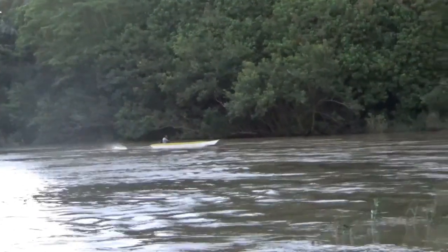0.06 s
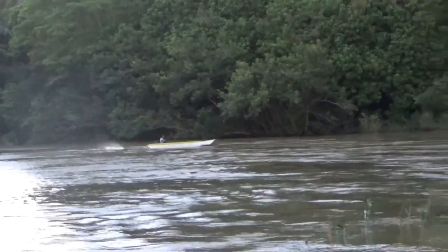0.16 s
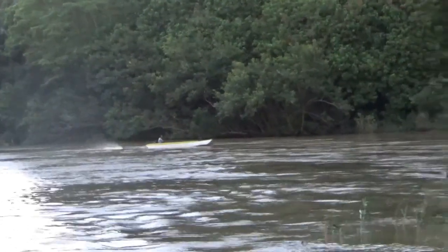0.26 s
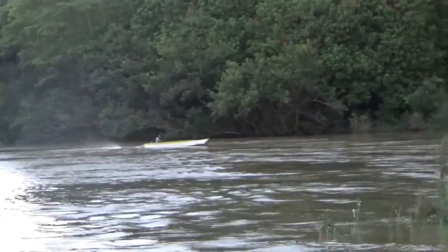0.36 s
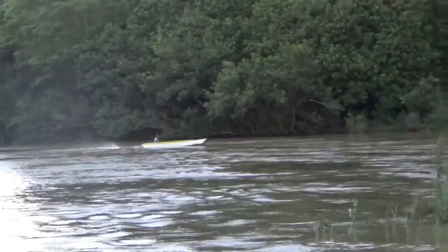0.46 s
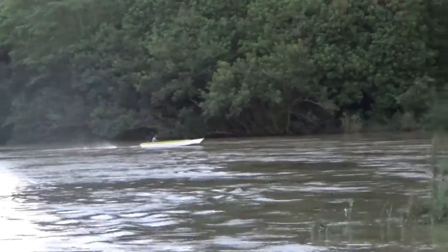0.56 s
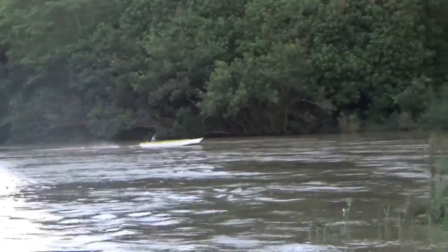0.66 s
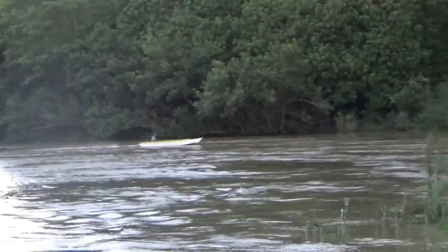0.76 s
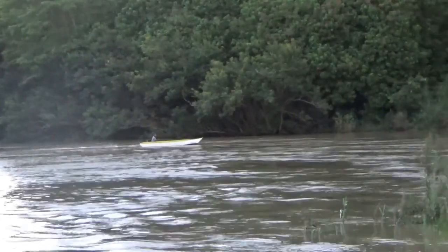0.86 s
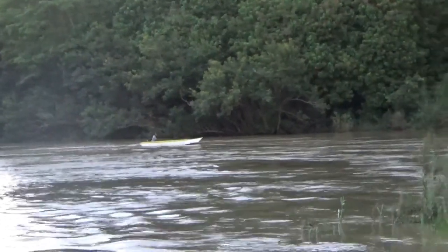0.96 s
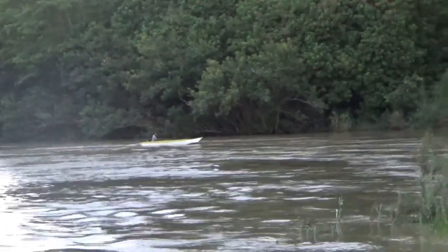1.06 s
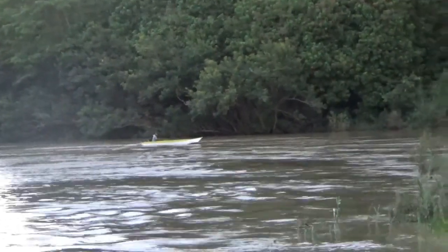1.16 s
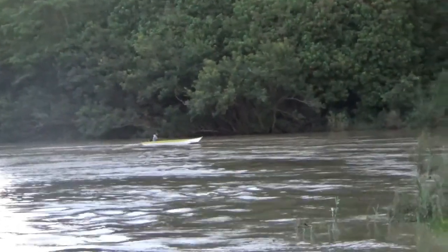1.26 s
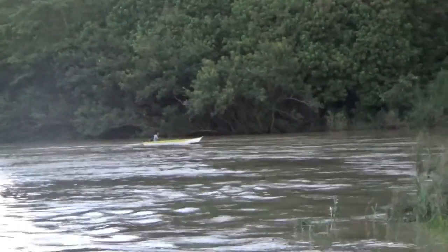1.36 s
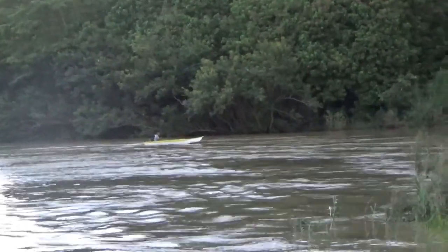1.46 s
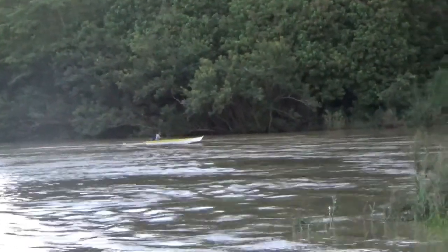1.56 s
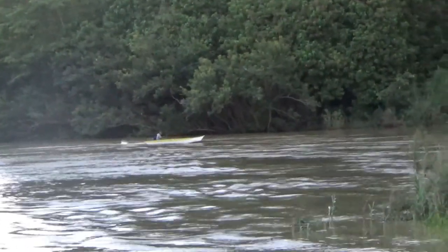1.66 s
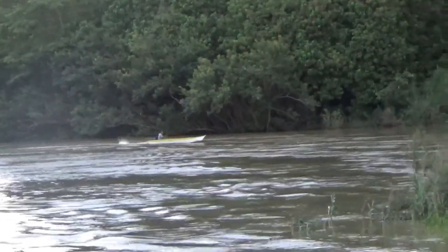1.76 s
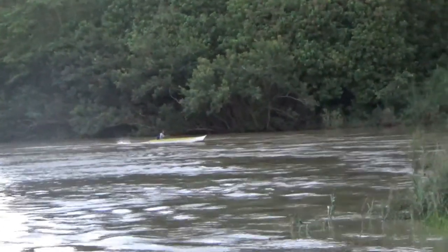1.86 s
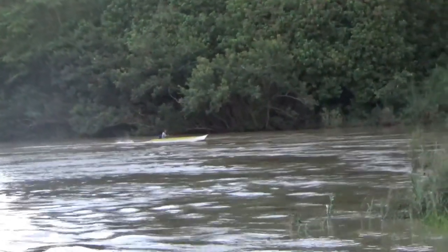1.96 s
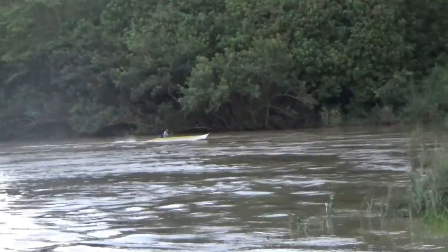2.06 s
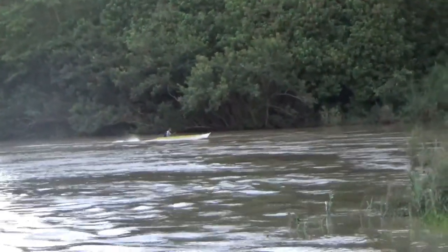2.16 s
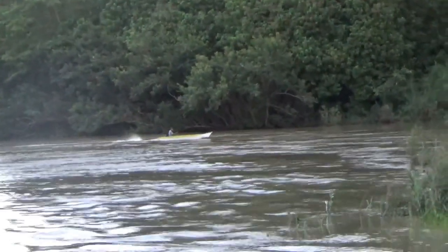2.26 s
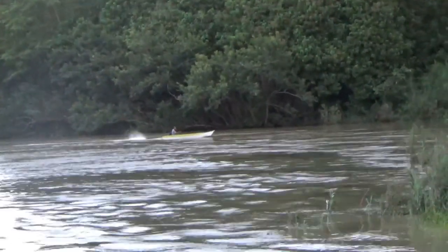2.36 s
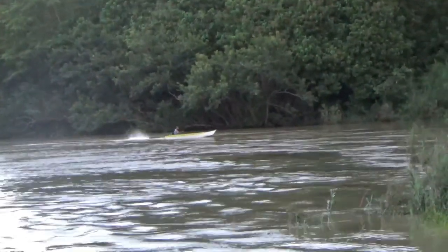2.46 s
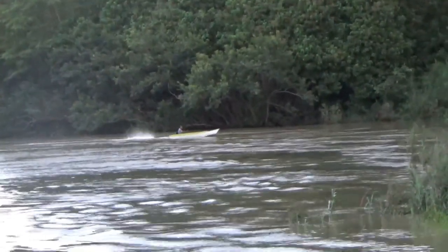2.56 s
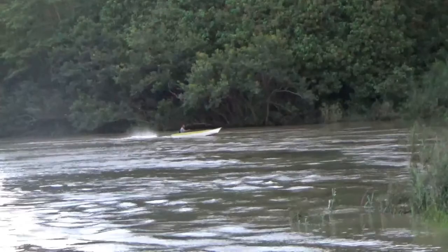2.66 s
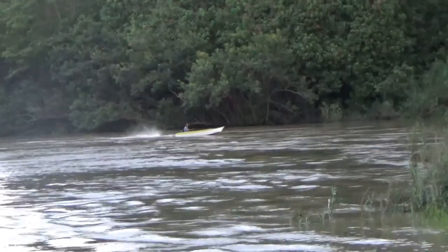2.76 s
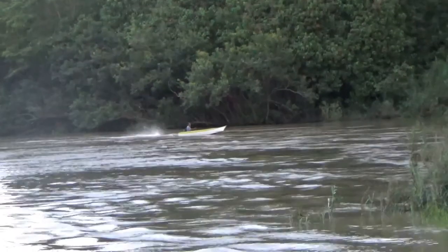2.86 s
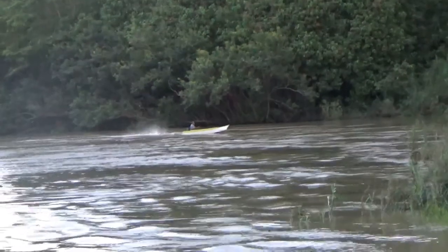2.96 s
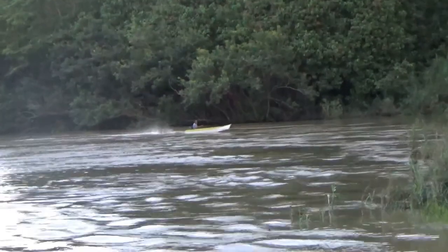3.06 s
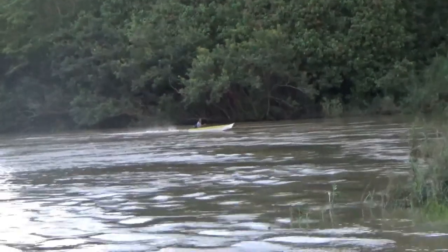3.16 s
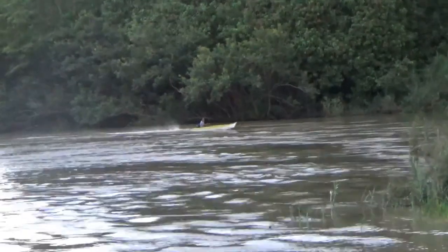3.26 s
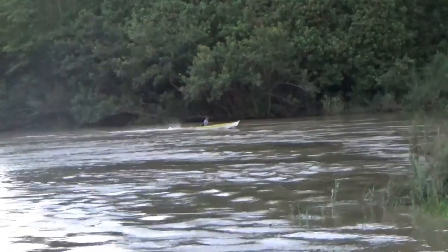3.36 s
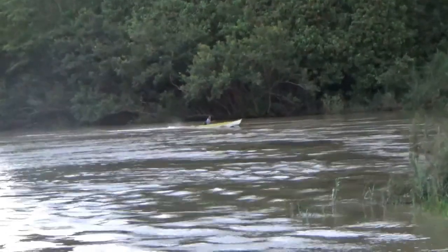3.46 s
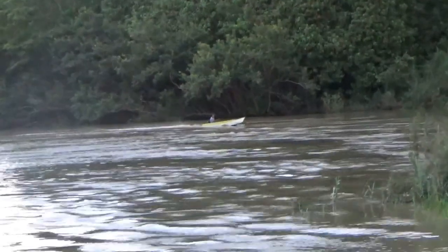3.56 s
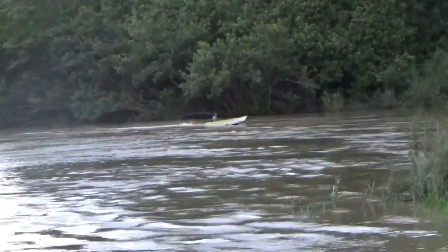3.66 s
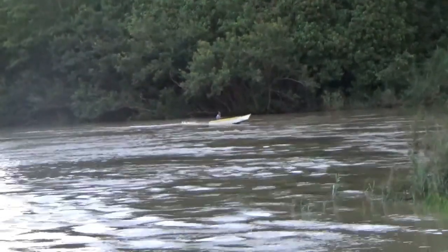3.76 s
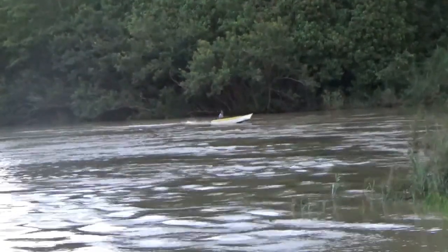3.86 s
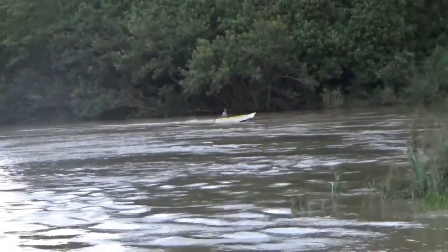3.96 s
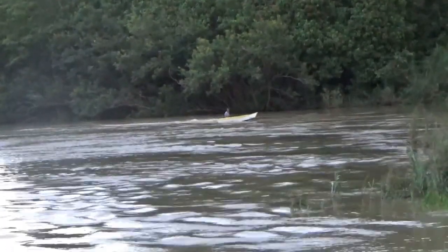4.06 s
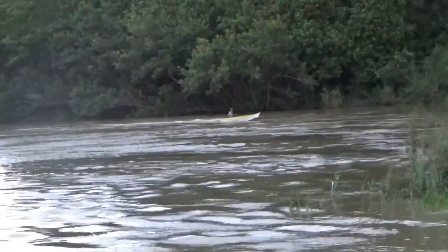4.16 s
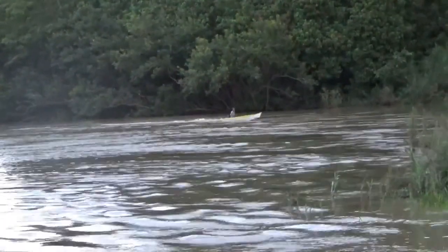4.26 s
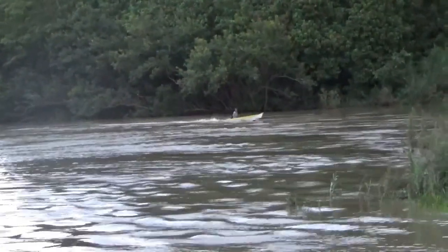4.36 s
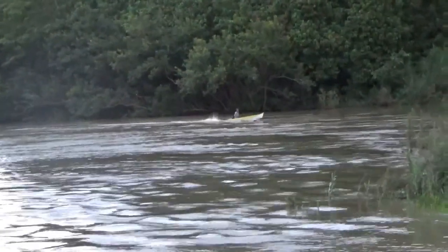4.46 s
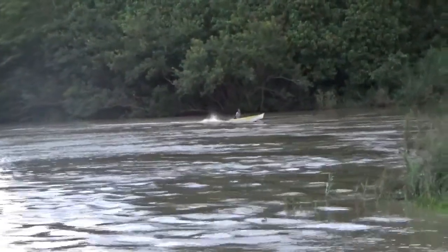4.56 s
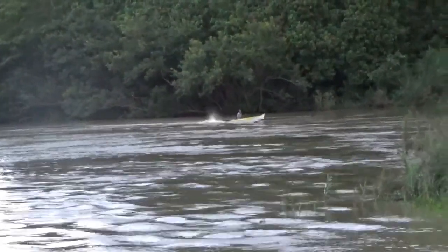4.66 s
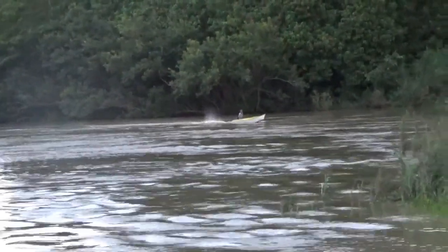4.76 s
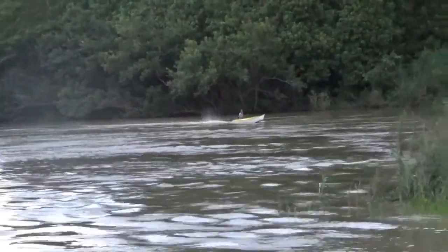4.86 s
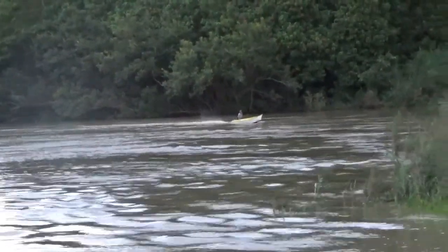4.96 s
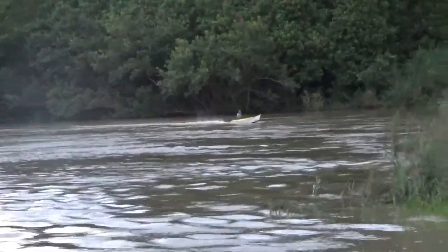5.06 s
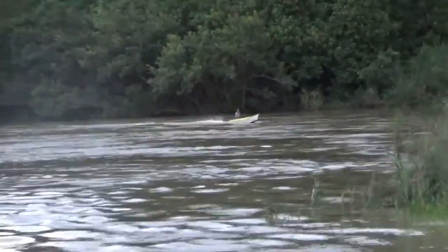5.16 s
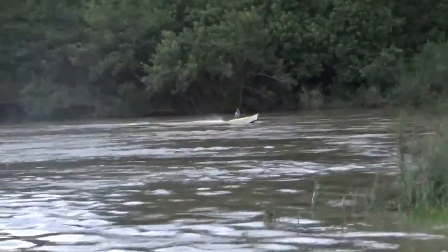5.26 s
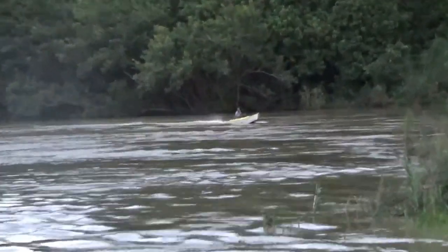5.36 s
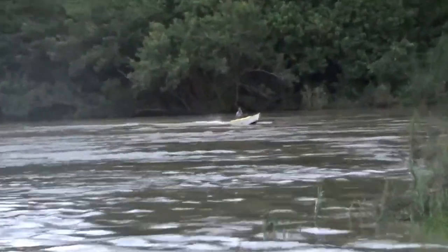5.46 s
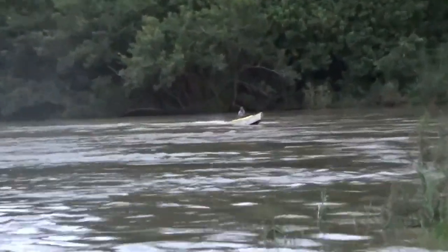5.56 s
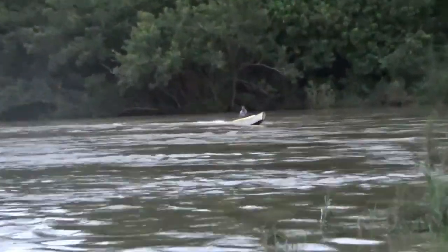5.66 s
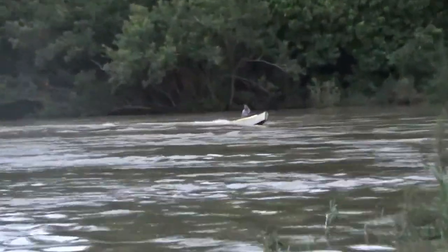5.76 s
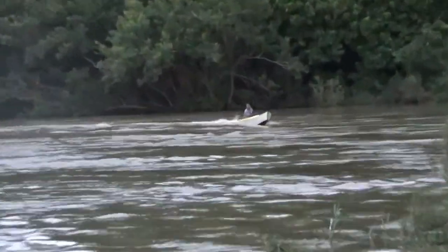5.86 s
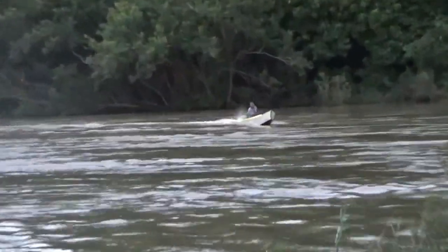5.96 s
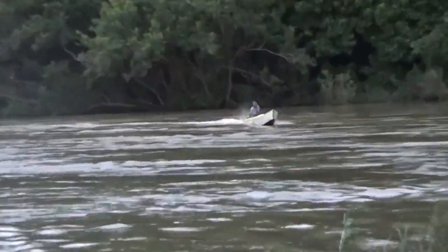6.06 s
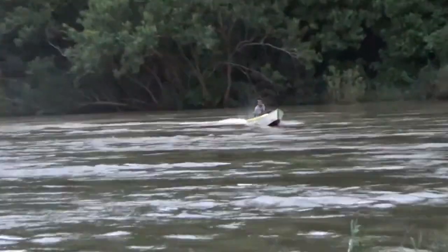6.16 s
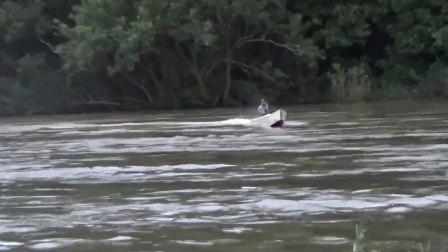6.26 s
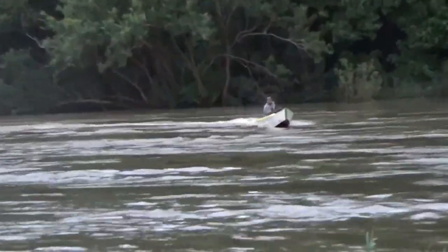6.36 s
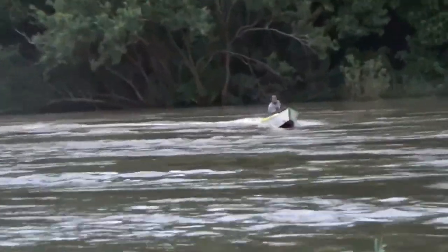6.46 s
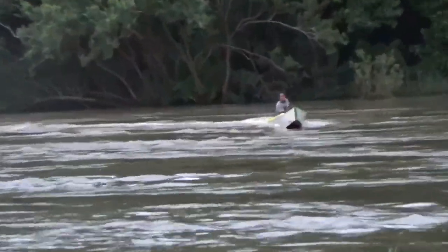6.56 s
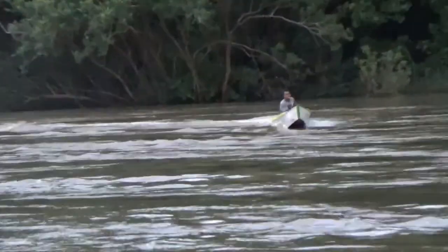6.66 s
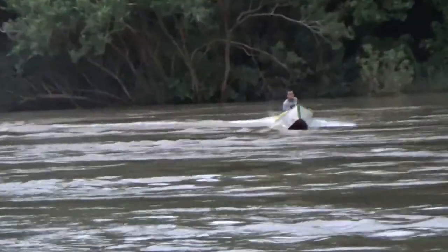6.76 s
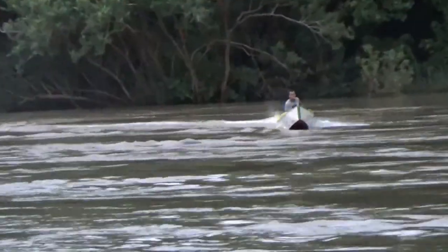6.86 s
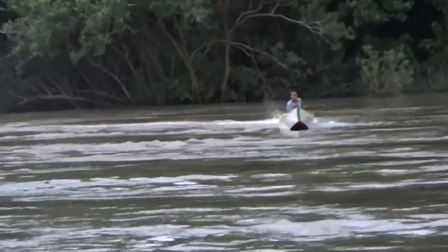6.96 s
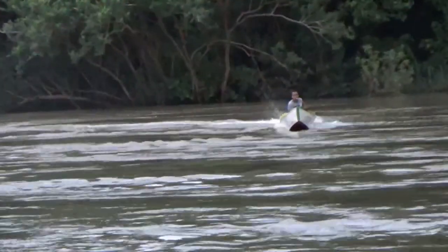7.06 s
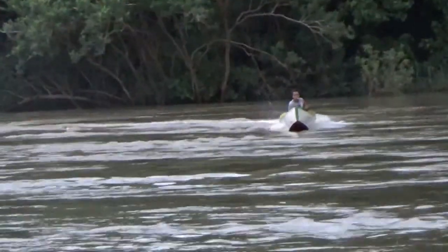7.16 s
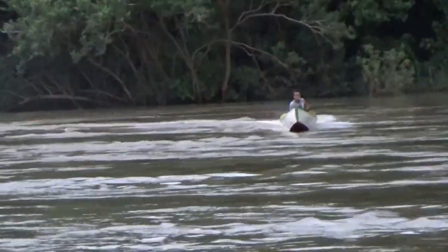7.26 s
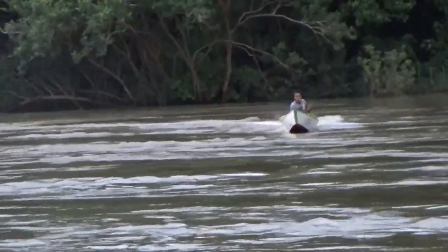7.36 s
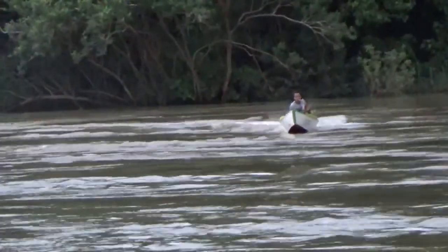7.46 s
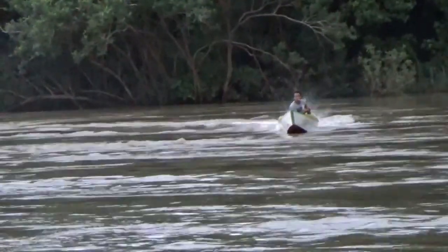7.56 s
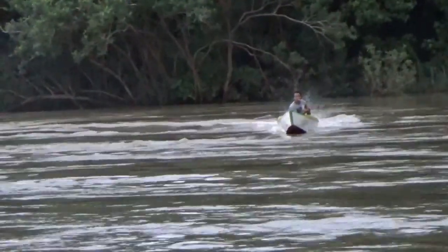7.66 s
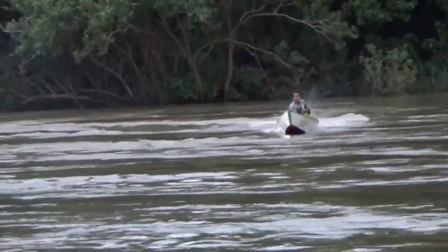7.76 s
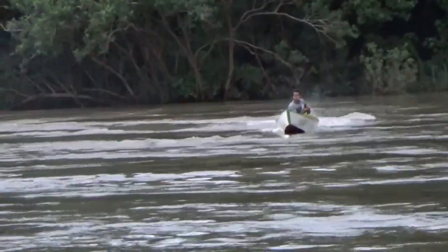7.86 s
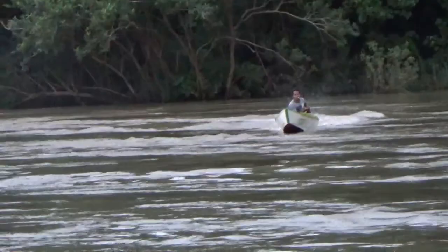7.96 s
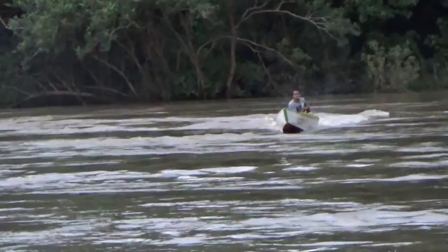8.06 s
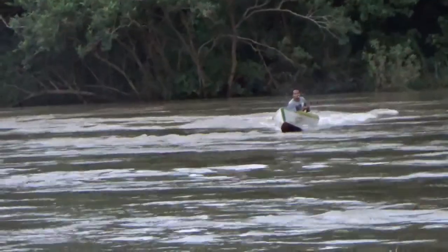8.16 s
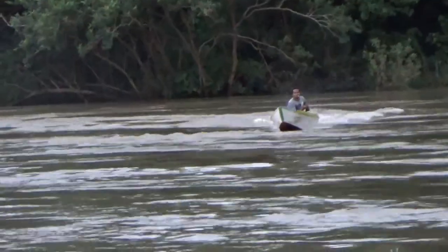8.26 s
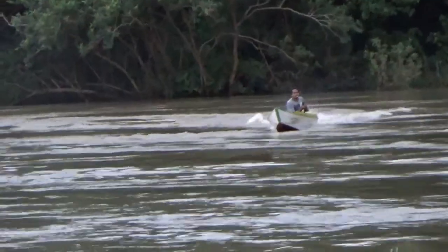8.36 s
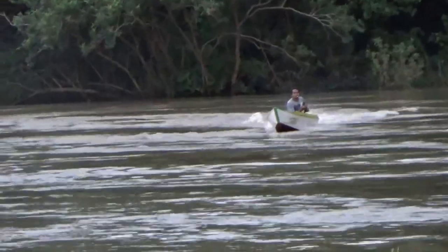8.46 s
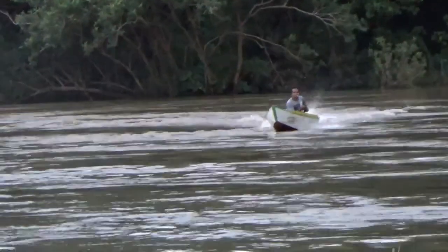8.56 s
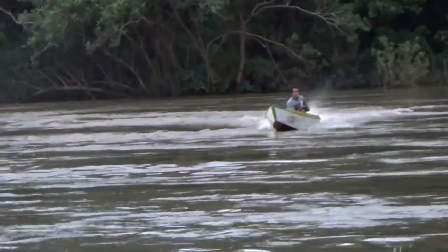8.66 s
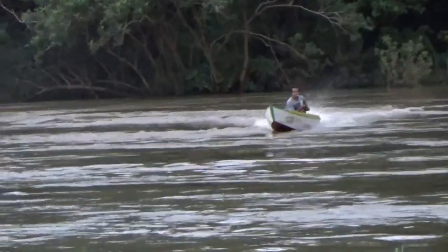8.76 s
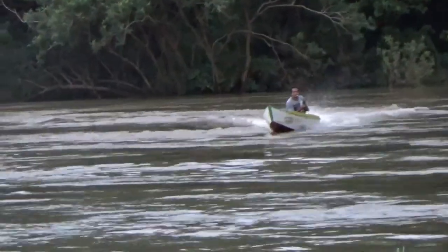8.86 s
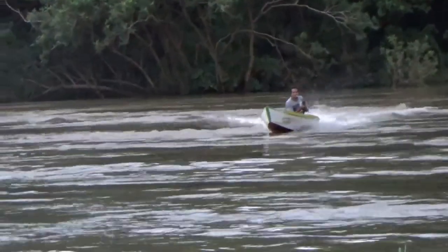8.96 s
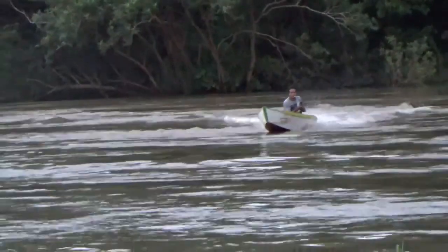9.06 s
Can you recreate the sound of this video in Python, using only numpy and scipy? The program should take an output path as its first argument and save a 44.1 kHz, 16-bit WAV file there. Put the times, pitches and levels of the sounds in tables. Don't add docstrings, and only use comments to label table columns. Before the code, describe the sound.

A small single-cylinder boat engine is heard across a wide river from the wooded bank. It begins as a fast, hollow popping, nearly thirty beats a second, and by 0.4 s is falling away to a weak idle, about ten separate dull putts a second from 0.7 to 1.7 s, leaving insects clearer. Around 1.8 s the throttle opens; the pops crowd together into a rough drone by 2.3 s, with mid-range pipe bark, crackle and hissing exhaust. It eases slightly near 3.9 s, then quickens past thirty beats a second from 4.9 s. Toward 9 s it becomes louder, fuller and closer, its sharp crackle softened as the bow faces the listener. Wash follows the engine's effort, and trees return diffuse echoes. Thin high insect trills run throughout, with brief pulsed cricket chirps, denser during the first two seconds and later spaced around half a second apart, over faint river hush.

```python
import sys
import numpy as np
from scipy import signal
from scipy.fft import rfft, irfft, next_fast_len
from scipy.io import wavfile
from scipy.ndimage import uniform_filter1d

SR = 44100
rng = np.random.default_rng(int(sys.argv[2]) if len(sys.argv) > 2 else 0)


def voltage_ratio(decibels):
    exponent = np.asarray(decibels, float) / 20
    return 10 ** exponent


def persist_wave(psi):
    counts = np.round(np.clip(psi, -1, 1) * 32767).astype(np.int16)
    wavfile.write(sys.argv[1], SR, np.atleast_2d(counts).T)


N = 402191
TIME = np.arange(N) / SR


def evened(x):
    return x / np.sqrt(np.mean(x ** 2) + 1e-20)


def read(points, hz):
    f, value = np.transpose(points)
    return np.interp(np.log(hz + 1), np.log(f + 1), value)


def hiss(spectrum, same, patchy_db):
    hz = np.fft.rfftfreq(1024, 1 / SR)
    a, b, c, d, patches = rng.standard_normal((N // 512 + 3, 513, 5)).T
    patches = uniform_filter1d(patches, size=10, axis=0)
    patches = evened(uniform_filter1d(patches, size=5, axis=1))
    same = np.clip(same, 0, 1)
    left = a + 1j * b
    right = same * left + np.sqrt(1 - same ** 2) * (c + 1j * d)
    z = np.array([left, right]) * voltage_ratio(read(spectrum, hz)[:, None] + patchy_db * patches)
    return evened(signal.istft(z, window="cosine", nperseg=1024, noverlap=512)[1][:, :N])


def resonate(x, hz, width, phase=0):
    turn = np.exp(2j * np.pi * np.cumsum(hz * np.ones(len(x))) / SR)
    r = np.exp(-np.pi * width / SR)
    low = signal.lfilter([1], np.convolve([1, -r], [1, -r]), x / turn + 1e-18)
    return evened((turn * low * np.exp(1j * phase)).real)


def ring(since, hz, length, crest, lean=1):
    part = np.clip(since / length, 0, 1) ** lean
    return evened(np.sin(np.pi * part) ** 2 * np.cos(2 * np.pi * hz * (since - crest)))


def engine_speed():
    # time in seconds, firings per second in Hz.
    throttle = [(0.0, 26.97), (0.17, 28.71), (0.36, 15.04), (0.7, 10.28), (1.67, 10.01), (2.0, 22.52),
                (2.33, 25.24), (2.81, 25.09), (2.86, 27.05), (3.66, 25.99), (3.86, 23.57), (4.85, 28.26),
                (4.88, 30.39), (6.02, 31.18), (6.38, 31.91), (7.73, 32.5), (7.75, 31.71), (9.12, 32.68)]
    lag_s = .149
    asked = np.interp(TIME, *np.transpose(throttle))
    r = np.exp(-1 / (lag_s * SR))
    return asked[0] + signal.lfilter([1 - r], [1, -r], asked - asked[0])


def voicing(fired, speed):
    # time in seconds, thump in dB, pipe bark re thump in dB, valve snap from 0 to 1.
    effort = [(0, -29.5, -7, 0.74), (.26, -31, -3, 0.7), (.3, -37.5, -8, 1), (.5, -41, -8, 1),
              (.85, -46.5, -7, 0.8), (1.74, -49.5, -8, 0.5), (1.8, -37, -5.5, 0.6), (2.1, -32, -2, 0),
              (2.5, -32, -3.5, 0.5), (3.68, -30, -2, 0.2), (3.86, -33, -0.5, 0), (4.7, -30.5, -3, 0.67),
              (5.04, -29, -4.5, 1), (6.1, -28.5, -8, 0.85), (7.15, -27.5, -2.5, 0.66),
              (7.7, -27.5, -4.5, 0.53), (8.6, -27.5, -2, 0.62), (9.12, -26, -3, 0.86)]
    # time in seconds, heading from -0.3 (stern quarter) through 0 (side-on) to 1 (bow-on).
    course = [(0, 0.088), (2.3, 0.071), (3, -0.26), (3.4, -0.0077), (3.9, 0.13), (5.1, 0.3), (6.2, 0.63),
              (7.1, 0.84), (7.7, 0.89), (9.12, 0.81)]
    s, thump_db, bark_db, snap = np.transpose(effort)
    heading = np.clip(np.interp(fired, *np.transpose(course)), -.3, 1)
    idle = np.clip((24 - speed) / 14, 0, 1)
    crack_db = -2 - 15 * heading ** 2 - 3 * idle
    spit_db = -13 - 47 * (heading - 0.21) ** 2
    slap_db = -23 + 25 * np.interp(fired, s, snap)
    crack_hz = 1703 + 164 * np.sin(1.13 * np.pi * np.maximum(heading, 0))
    return (np.interp(fired, s, thump_db), np.interp(fired, s, bark_db),
            crack_db, spit_db, slap_db, crack_hz)


def pipe_thump(since, fired, speed, heat, luck):
    # frequency in Hz, length in seconds, time of a crest in seconds.
    lowest_mode = (223.4, 0.009, 0.0064)
    # frequency in Hz, length in seconds, time of a crest in seconds.
    silencer = (320, .015, 0.005475)
    # time in seconds, factor on the lowest mode.
    gas_warmth = [
        (0, 0.83),
        (.4, 0.88),
        (1.8, 0.94),
        (2.4, 0.892),
    ]
    hz, length, crest = lowest_mode
    warmth = np.interp(fired, *np.transpose(gas_warmth))
    length = length * (29 / speed) ** .5 / warmth ** 2
    thump = voltage_ratio(17 / speed * luck[0]) * ring(since, hz * heat * warmth, length, crest, lean=1.05)
    turns = np.cumsum(speed) / SR
    thump += voltage_ratio(-12) * (speed / 30) ** 2 * np.sin(4 * np.pi * turns)
    box_db = -12.5 + 0.16 * np.maximum(speed - 27, 0) + 0.55 * np.maximum(27 - speed, 0)
    return thump + voltage_ratio(box_db) * ring(since, *silencer)


def pipe_bark(since, speed, heat, puffs, slap_db, luck):
    # frequency in Hz, length in seconds, time of a crest in seconds.
    upper_mode = (685, .0053, .0014)
    hz, length, crest = upper_mode
    hz = hz * heat ** .3 * (1 + .008 * luck[2])
    length = length * np.maximum(24 / speed, 1) ** .7
    bark = voltage_ratio(.7 * luck[1]) * ring(since, hz, length, crest, lean=.8)
    bark += voltage_ratio(-13) * resonate(puffs, 720, 260)
    shut = since - .236 / speed
    slap = ring(shut, 720 * (1 + 0.012 * luck[18]), 0.0055, crest, lean=0.92)
    return bark + voltage_ratio(slap_db + 1.3 * luck[3]) * slap


def pipe_crack(kicks, speed, puffs, spit_db, crack_hz, luck):
    # frequency in Hz, width in Hz, level in dB.
    high_modes = [(1112, 190, -7.5), (2526, 200, -8), (3244, 300, -9), (4090, 114, -15), (4700, 190, -18),
                  (5620, 190, -18.5)]
    drive = kicks * (speed / 26) ** 1.5 + 0.2 * puffs
    crack = resonate(drive * voltage_ratio(.9 * luck[4]), crack_hz * (1 + .03 * luck[5]), 480, 3.1)
    lift = np.maximum(crack_hz / 1730, 1) ** .7
    for k, (hz, width, db) in enumerate(high_modes):
        facing_db = (spit_db + 19.0) * hz / 10000
        mode_hz = hz * lift * (1 + .02 * luck[12 + k])
        mode = resonate(drive * voltage_ratio(1.3 * luck[6 + k]), mode_hz, width, 3.1)
        crack += voltage_ratio(db + facing_db) * mode
    return evened(crack)


def gas_spit(puffs, luck):
    b, a = signal.butter(2, 5200, "high", fs=SR)
    return evened(signal.lfilter(b, a, puffs * voltage_ratio(0.6 * luck[19])))


def exhaust():
    speed = engine_speed()
    firing = np.floor(np.cumsum(speed) / SR - .035).astype(int) + 1
    kicks = np.diff(firing, prepend=0)
    fired = np.maximum.accumulate(np.where(kicks > 0, TIME, -1))
    since = TIME - fired
    thump_db, bark_db, crack_db, spit_db, slap_db, crack_hz = voicing(fired, speed)
    luck = rng.standard_normal((firing[-1] + 1, 20))[firing].T
    puff_shape = np.sin(np.pi * np.clip(since / .0075, 0, 1) ** .3) ** 2
    puffs = rng.standard_normal(N) * puff_shape
    heat = 1 + .024 * (np.maximum(speed, 23) - 29)
    pipe = pipe_thump(since, fired, speed, heat, luck)
    pipe += voltage_ratio(bark_db) * pipe_bark(since, speed, heat, puffs, slap_db, luck)
    pipe += voltage_ratio(crack_db) * pipe_crack(kicks, speed, puffs, spit_db, crack_hz, luck)
    pipe += voltage_ratio(spit_db + 3.5) * gas_spit(puffs, luck)
    return voltage_ratio(thump_db) * pipe, thump_db + 10 * np.log10(speed / 26)


def spray(effort_db):
    # frequency in Hz, density in dB per Hz.
    wash = [(60, -12.5), (200, -3.5), (440, -7), (690, -2.5), (900, -12.5), (1100, -8), (1330, -13),
            (1750, -11.5), (2200, -17), (3300, -19.5), (6000, -21), (11000, -31.5)]
    wash_db = 0.73 * uniform_filter1d(effort_db, size=8000) - 11.5
    return voltage_ratio(wash_db) * hiss(wash, same=0.71, patchy_db=1.0)


def river_air():
    # frequency in Hz, density in dB per Hz.
    hush = [(45, 0), (190, -17), (500, -42), (720, -4.5), (950, -14.5), (1800, -13.5), (4100, -17.5),
            (4700, -13.5), (5800, -19.5), (6500, -16), (7000, -4), (7700, -15.5), (8400, -9), (9300, -16.5),
            (10500, -12), (11200, -58)]
    return voltage_ratio(-45) * hiss(hush, same=0.56, patchy_db=3.0)


def singers():
    # syllables per second in Hz, phase in turns, length in seconds, start in Hz, end in Hz,
    # level in dB, left-right difference in dB.
    trills = [(49.26, .05, .011, 7620, 8250, -40.5, 2.5), (49.9, 0.613, 0.004, 7700, 8100, -50, -6),
              (48.9, 0.26, 0.015, 7100, 6100, -50.5, -3), (11.22, 0.54, 0.043, 7400, 7600, -44, 4),
              (11.09, 0.047, 0.029, 7200, 7080, -46.5, -2), (23.5, 0.11, 0.031, 7480, 7540, -44.5, -3)]
    out = np.zeros((2, N))
    for rate_hz, phase, length, start_hz, end_hz, db, pan_db in trills:
        turns = TIME * rate_hz + phase
        part = np.minimum(turns % 1 / (rate_hz * length), 1)
        luck = rng.standard_normal((int(turns[-1]) + 1, 2))[turns.astype(int)].T
        hz = start_hz + (end_hz - start_hz) * part + 45 * luck[0]
        hoarse = 1 + 0.38 * evened(uniform_filter1d(rng.standard_normal(N), size=90))
        swell = np.sin(np.pi * part) * hoarse * voltage_ratio(1.97 * luck[1])
        song = swell * np.sin(2 * np.pi * np.cumsum(hz) / SR)
        out += voltage_ratio(db + np.array([[.5], [-.5]]) * pan_db) * evened(song)
    return out


def banks(x, count=2):
    # frequency in Hz, reverberation time T60 in seconds.
    decay = [(100, 1.3), (700, 1.85), (2000, 2.26), (6000, 1.9)]
    # frequency in Hz, strength of the return in dB.
    foliage = [(60, -32), (250, -10.5), (700, -11), (2000, -8), (7500, -5.5)]
    out = np.zeros((2, N))
    size = 30000
    for k in range(count):
        taps = np.zeros((2, size))
        at = np.arange(500, size - 20, 20) + rng.integers(0, 20, (2, (size - 501) // 20))
        np.put_along_axis(taps, at, rng.choice([-1., 1.], at.shape), 1)
        hz, t, z = signal.stft(taps + 0.25 * taps[::-1], SR, nperseg=512)
        z = z * voltage_ratio(-60 * t / read(decay, hz)[:, None] + read(foliage, hz)[:, None])
        tail = signal.istft(z, SR, nperseg=512)[1] / np.sqrt(SR / 200)
        share = np.cos(np.pi * (5.3 * TIME + k / count))
        out += signal.fftconvolve((x * share)[None], tail, axes=1)[:, :N]
    return out


def crickets():
    # start in seconds, end in seconds, pitch in Hz, level in dB.
    chirps = [(0.735, 0.958, 4410, -51), (0.297, 0.552, 4740, -56), (0.415, 0.496, 6350, -48),
              (0.582, 0.628, 6470, -49), (1.634, 1.7, 6400, -55), (1.116, 1.173, 3640, -55),
              (1.196, 1.58, 4720, -62), (1.577, 1.776, 4600, -58), (2.017, 2.25, 4670, -55),
              (2.95, 3.164, 4700, -50), (4.95, 5.112, 4270, -53), (5.487, 5.64, 4350, -51),
              (5.957, 6.153, 4470, -49), (6.624, 6.797, 4420, -50), (7.2, 7.345, 4360, -50),
              (7.73, 7.92, 4400, -50), (8.286, 8.49, 4400, -50)]
    stroke_hz = 71.5
    out = np.zeros(N)
    for start, end, hz, db in chirps:
        t = np.arange(0, end - start, 1 / SR)
        strokes = 0.13 + np.sin(np.pi * stroke_hz * t) ** 2
        strokes *= signal.windows.tukey(len(t), .3)
        scatter = evened(uniform_filter1d(rng.standard_normal(len(t)), size=200))
        strokes *= 1 + 0.14 * scatter
        tone = np.sin(2 * np.pi * (hz + 150 * (t - t[-1])) * t)
        out[round(start * SR):][:len(t)] += voltage_ratio(db) * evened(strokes * tone)
    return out


def scene():
    boat, effort_db = exhaust()
    direct = boat + singers() + crickets()
    return direct + banks(direct.mean(0)) + spray(effort_db) + river_air()


def band_limit(x):
    return signal.sosfilt(signal.butter(12, 11750, fs=SR, output="sos"), x)


def record(dry):
    # frequency in Hz, left-right difference in dB.
    imbalance = [(60, 1.0), (120, 1.5), (220, 1.5), (430, 2.5), (820, 1.5), (1570, 0.5), (3020, 0.0),
                 (5800, 0.5), (11200, 0.5)]
    edge_hz, bass_hz = 11060, 52
    size = next_fast_len(N)
    hz = np.fft.rfftfreq(size, 1 / SR)
    lean_db = read(imbalance, hz) * np.array([[.5], [-.5]])
    colour = (hz < edge_hz) * hz ** 2 / (hz ** 2 + bass_hz ** 2)
    mix = irfft(rfft(dry, size) * voltage_ratio(lean_db) * colour, size)[:, :N]
    return band_limit(mix)


dry = scene()
out = record(dry)
persist_wave(out)
```